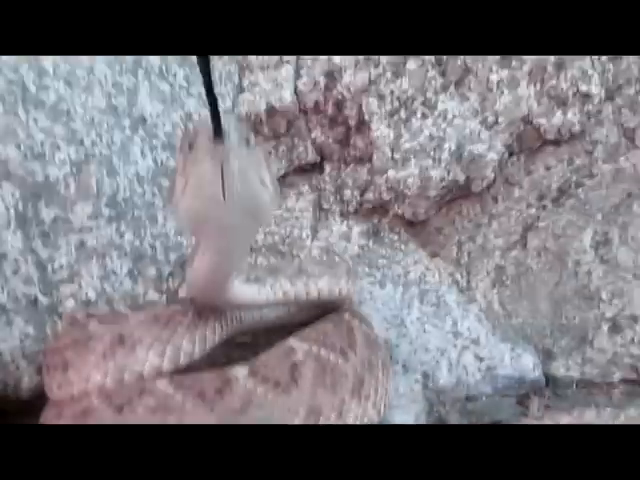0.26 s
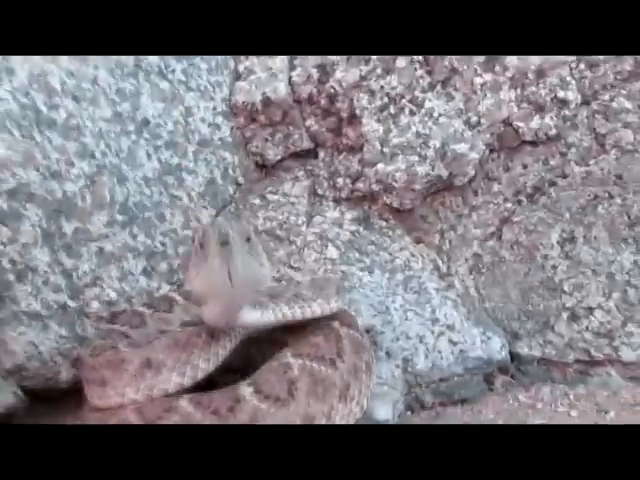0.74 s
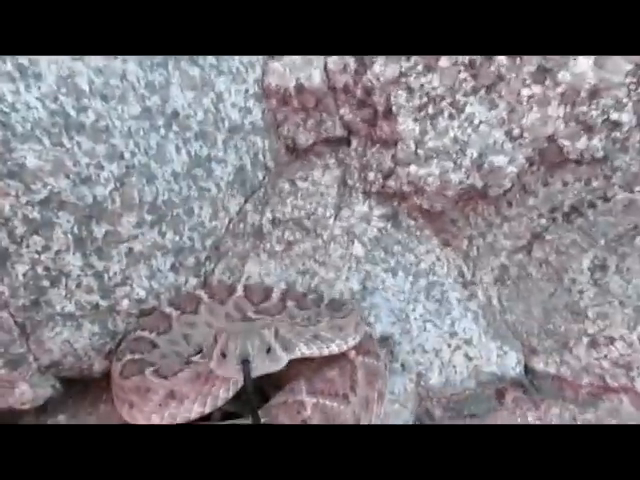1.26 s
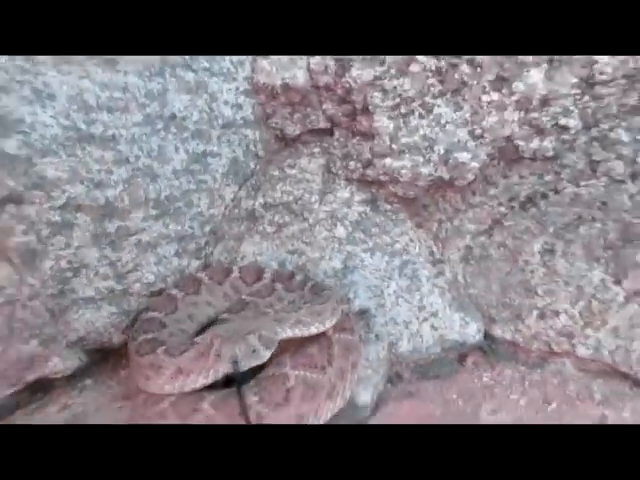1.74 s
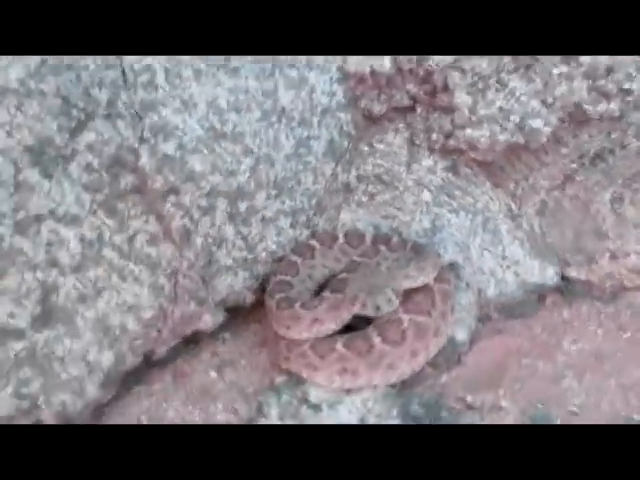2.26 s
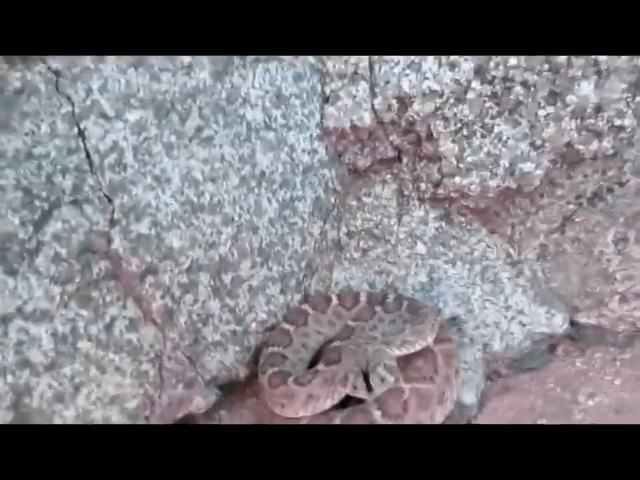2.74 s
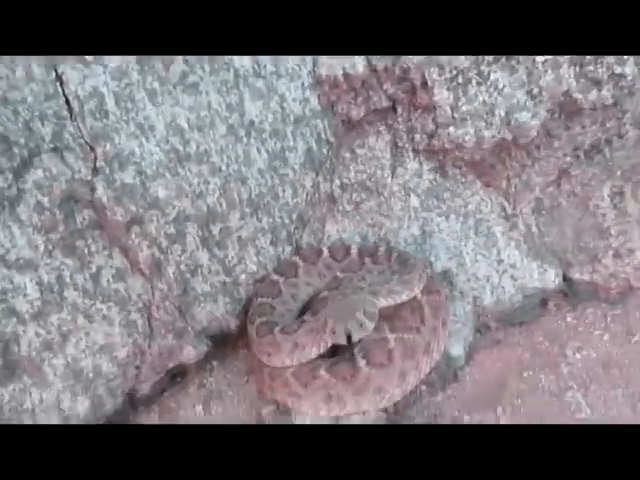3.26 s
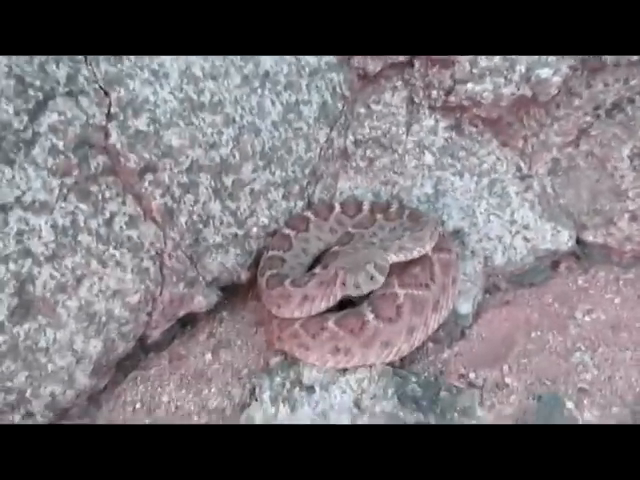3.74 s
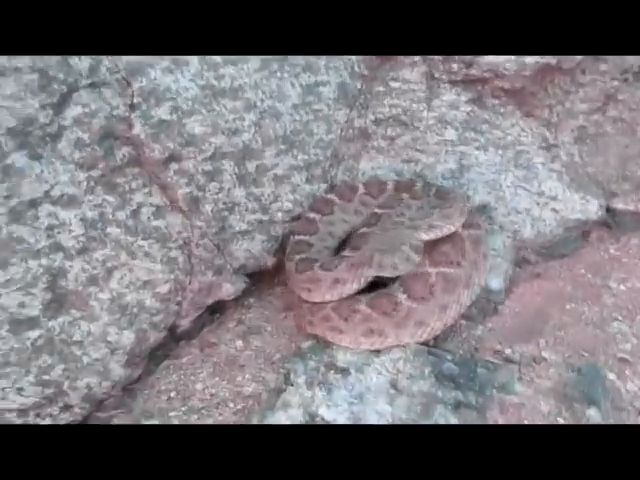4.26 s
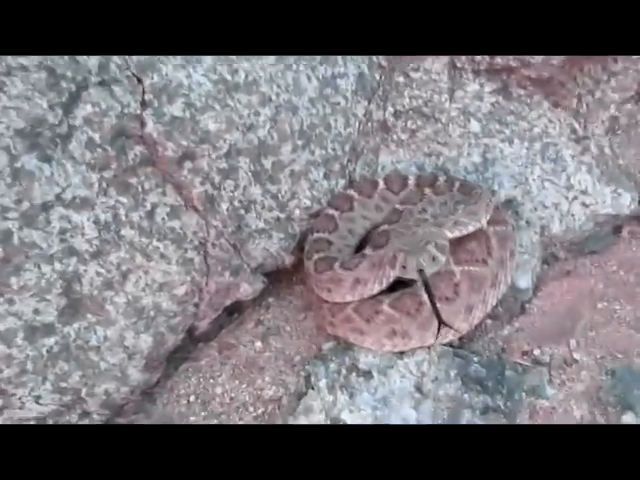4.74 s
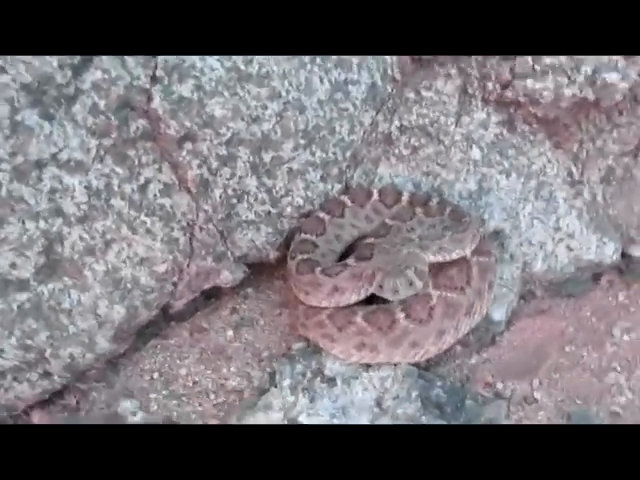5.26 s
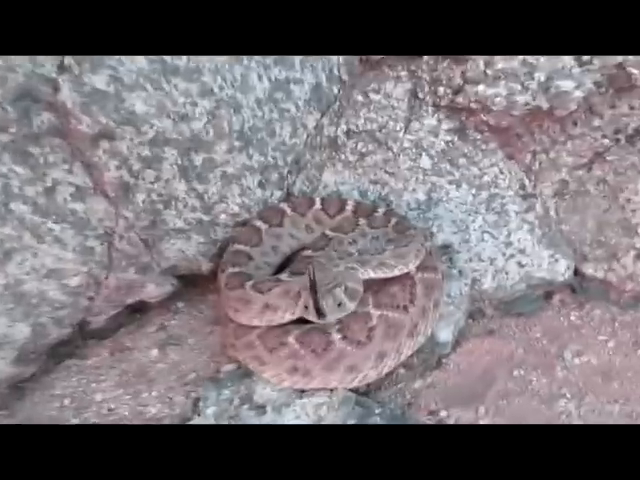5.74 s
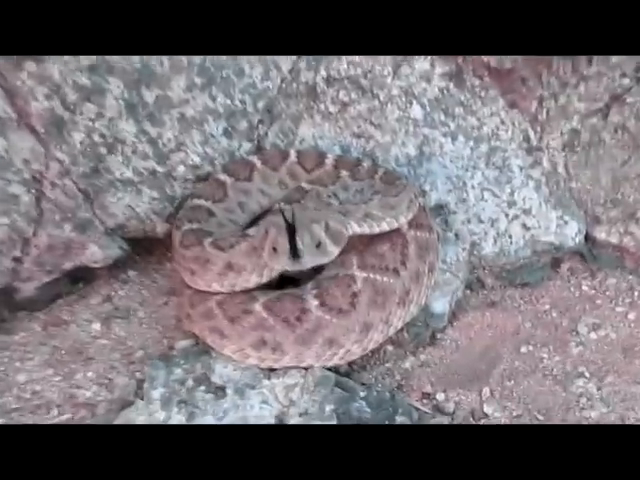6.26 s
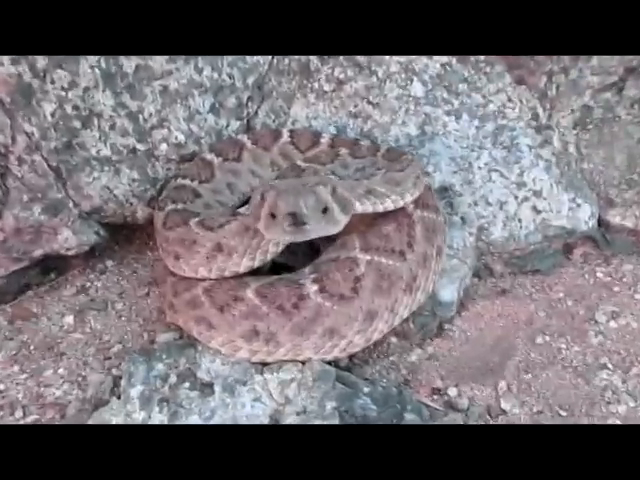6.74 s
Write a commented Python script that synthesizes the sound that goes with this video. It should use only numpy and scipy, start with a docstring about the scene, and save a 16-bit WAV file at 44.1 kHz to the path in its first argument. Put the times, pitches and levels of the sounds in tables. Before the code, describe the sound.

A bright, dry, hissing rattle dominates, close and nearly centred. It stutters at first, fuses into a harsh buzz, and settles into around twenty quick pulses per second with tiny irregular gaps. Beneath it are a few gritty shoe scuffs, faint rustles, quiet open air, and dull wind thumps on the left of the microphone, strongest in the middle and near the end.

```python
"""A rattlesnake against a rock wall opens with a few short tail bursts, over a shoe scuff and a soft rustle.
From 0.4 s it buzzes for a second, slackening once into bursts, then settles into about twenty bursts a second;
each tail stroke knocks hollow segments together, and their resonances shift as the snake lowers and coils.
Past 2 s shoes scuff gritty stone and noise gusts buffet mostly the left port, strongest near 3 s and 6 s.
A short buzz at 6.3 s leads into the last bursts; faint rustles come and go and quiet air noise lies below."""
import sys
import numpy as np
from scipy import signal
from scipy.io import wavfile
from scipy.ndimage import uniform_filter1d

SR = 44100
rng = np.random.default_rng(int(sys.argv[2]) if len(sys.argv) > 2 else 0)


def materialize(psi):
    """Save the field psi as 16-bit PCM at rate SR to the path in sys.argv[1].

    A 1-D psi becomes a single channel; in a 2-D psi each row is a channel.
    """
    bounded = np.clip(np.atleast_2d(psi).T, -1, 1)
    quanta = np.round(bounded * 32767).astype(np.int16)
    wavfile.write(sys.argv[1], SR, quanta)


N = 308700
TIME = np.arange(N) / SR


def from_db(db):
    """Decibels to an amplitude factor."""
    return 10 ** (np.asarray(db) / 20)


def rms_one(x):
    """Scales a signal to an RMS of 1."""
    return x / np.sqrt(np.mean(x ** 2) + 1e-20)


def in_time(rows, **ends):
    """A curve over time joined by straight lines."""
    return np.interp(TIME, *np.transpose(rows), **ends)


def at_hz(points, hz):
    """A spectrum joined by straight lines over log frequency."""
    points = np.array(points)
    return np.interp(np.log(hz), np.log(points[:, 0]), points[:, 1])


def drift(rate_hz):
    """Slow random wandering with spread 1: low-passed noise, computed at every 40th sample."""
    step, warm_up = 40, 2000
    pole = np.exp(-2 * np.pi * rate_hz * step / SR)
    white = rng.standard_normal(N // step + warm_up + 2)
    slow = signal.lfilter([1], [1, -2 * pole, pole * pole], white)[warm_up:]
    return np.interp(np.arange(N) / step, np.arange(len(slow)), rms_one(slow))


def evened(x, seconds):
    """Takes out level changes slower than the given time."""
    local_power = np.abs(uniform_filter1d(x ** 2, int(seconds * SR)))
    return x / np.sqrt(local_power + 1e-9)


def resonate(x, hz, width_hz):
    """A steep-sided resonance, two peak filters in a row, that keeps the power of white input."""
    peak = np.concatenate(signal.iirpeak(hz, hz / width_hz, fs=SR))
    sos = np.tile(peak, (2, 1))
    power = np.sum(signal.sosfilt(sos, signal.unit_impulse(1024)) ** 2)
    return signal.sosfilt(sos, x + 1e-18) / np.sqrt(power)


def noise_bands(spectrum, channels=2):
    """Yields half-octave noise bands as (Hz, signal), of total power 1."""
    low_hz, high_hz = spectrum[0][0], spectrum[-1][0]
    centres = np.geomspace(low_hz, high_hz, round(2 * np.log2(high_hz / low_hz)) + 1)
    # the spectrum is per Hz, so a wider band carries more power
    gains = from_db(at_hz(spectrum, centres)) * np.sqrt(centres)
    gains = gains / np.linalg.norm(gains)
    white = rng.standard_normal((2, channels, N))
    for k, (hz, gain) in enumerate(zip(centres, gains)):
        edges = [hz / 2 ** .25, hz * 2 ** .25]
        sos = signal.butter(2, edges, "band", fs=SR, output="sos")
        # neighbouring bands take different noise
        yield hz, gain * rms_one(signal.sosfilt(sos, white[k % 2]))


def noise(spectrum, channels=2):
    """Coloured noise of power 1."""
    return sum(band for hz, band in noise_bands(spectrum, channels))


def swells(rows, rise_db_per_s, fall_db_per_s):
    """Summed power of events that each rise, hold their level and fall."""
    power = np.zeros(N)
    for start_s, length_s, level_db in rows:
        rise_db = rise_db_per_s * np.clip(start_s - TIME, 0, 1)
        fall_db = fall_db_per_s * np.clip(TIME - start_s - length_s, 0, 1)
        power += from_db(level_db - rise_db - fall_db) ** 2
    return power


# unbroken buzzing, relative level, one table per spell: [time_s, level_db]
BUZZ_SPELLS = [
    [(0.382, -18.5), (0.44, -18), (0.53, -20.5), (0.66, -22.0), (0.78, -21.0), (0.875, -22), (0.9, -34),
     (0.95, -29), (0.98, -19), (1.17, -18.5), (1.38, -19.5), (1.43, -21.5)],
    [(6.295, -19.5), (6.368, -21)],
]
# hollow-segment resonances in each pose, with the part the rocks scatter sideways, relative to level_db:
# [pitch_hz, width_hz, level_db, side_db]
REARED_RINGS = [(2152, 2270, -26.0, -34), (3197, 580, -15.5, -5), (3966, 490, -21, 1),
                (5533, 1740, -9.5, -9), (6436, 905, -5.5, -20), (6866, 2300, -7.5, -5.5),
                (8947, 1100, -10, -3), (10840, 1820, -10.5, -3), (12620, 3870, -11.0, -3.5)]
LOWERED_RINGS = [(2322, 1720, -25, -26.5), (2801, 200, -27.5, -3.5), (3717, 750, -20.5, -4),
                 (5333, 465, -12, -8.5), (5936, 720, -4.5, -13.5), (7073, 1190, -7, -6.5),
                 (9186, 1340, -8.5, -1.5), (11187, 1650, -6.5, -4.5), (13200, 3170, -18.5, 0)]
COILED_RINGS = [(2546, 2670, -25.5, -19.5), (3252, 857, -21, -16), (4136, 530, -18, -9),
                (5631, 647, -14.5, -11.5), (6235, 958, -3.5, -16), (7700, 2040, -10, -2.5),
                (9252, 670, -12.5, -9), (11140, 3370, -5, -6), (14280, 600, -28.5, 1.5)]
SETTLED_RINGS = [(2426, 2780, -28.5, -57.5), (3311, 976, -22.5, -13.5), (4120, 498, -17.5, -10),
                 (5700, 440, -11, -13), (6217, 843, -2.5, -18.5), (7472, 2010, -9.5, -6.5),
                 (9344, 620, -11, -13.5), (11170, 3420, -6, -7), (11240, 6600, -13.5, -4.5)]
# the snake's posture, 0 reared, 1 lowered, 2 coiled, 3 settled: [time_s, pose_index]
POSTURE = [(0.7, 0), (1.02, 1), (1.42, 1), (1.62, 2), (4.1, 2), (5.2, 3)]


def rattle(loose_db=6.0, driven_db=-26, shifting_db=1.5, idle_db=-58, idle_spread_db=5, unsteady_db=-0.18):
    """The knocks ring the hollow segments, each resonance with a strength of its own."""
    bursts = beat()
    buzz = sum(from_db(in_time(spell, left=-np.inf, right=-np.inf)) ** 2 for spell in BUZZ_SPELLS)
    buzzing = uniform_filter1d((buzz > 0) * 1., size=400)
    buzz = uniform_filter1d(buzz, size=400) * from_db(unsteady_db * drift(25.7)) ** 2
    # the tail is never quite still between bursts
    idle = from_db(idle_db + idle_spread_db * drift(11.3)) ** 2
    effort = np.sqrt(np.maximum(shaking(bursts), buzz) + idle)
    # segments that are no longer driven hard tumble unevenly
    looseness = 1 / (1 + (effort / from_db(driven_db)) ** 2)
    tumble = from_db(loose_db * drift(105) * looseness)
    knocks = effort * tumble * rms_one(collisions(bursts, buzzing))

    pose, out = in_time(POSTURE), np.zeros((2, N))
    for k, rings in enumerate((REARED_RINGS, LOWERED_RINGS, COILED_RINGS, SETTLED_RINGS)):
        share = np.sqrt(np.clip(1 - np.abs(pose - k), 0, 1))   # crossfade at constant power
        held = share > 0
        for hz, width_hz, level_db, side_db in rings:
            # the swinging rattle radiates each resonance a little differently from moment to moment
            shifting = from_db(shifting_db * drift(60))
            drive = knocks * share * shifting * rng.standard_normal((2, N))
            gains = from_db([[level_db], [level_db + side_db]])
            mid, side = resonate(drive[:, held], hz, width_hz) * gains
            out[:, held] += np.array([mid + side, mid - side])
    return out


# runs of evenly spaced tail bursts, relative level: [first_burst_s, last_burst_s, burst_count, level_db]
BURST_RUNS = [(0.011, 0.126, 3, -19), (0.176, 0.349, 5, -18), (0.876, 0.966, 3, -18.5),
              (1.438, 1.614, 5, -19.5), (1.665, 2.5, 18, -20), (2.543, 2.747, 5, -19.5),
              (2.809, 2.963, 4, -19.5), (3.023, 3.383, 7, -19.5), (3.44, 3.819, 7, -19),
              (3.896, 4.086, 4, -19.0), (4.16, 4.422, 5, -19.2), (4.485, 4.678, 5, -19),
              (4.721, 4.88, 4, -19.0), (4.929, 4.929, 1, -28), (4.963, 5.43, 10, -18.5),
              (5.483, 6.068, 13, -19), (6.105, 6.324, 7, -18), (6.352, 6.696, 9, -17),
              (6.742, 6.956, 5, -18.5)]
# fade_s is the time to fall 60 dB at the usual beat; a faster beat keeps the segments moving longer
USUAL_BURSTS_PER_S, FADE_S, FADE_FOLLOWS = 20.74, 0.07616, 0.84


def beat(level_spread_db=1.176, fade_spread=0.1565):
    """Lays out all bursts as (time_s, level_db, fade_s), each varying in level and fading time."""
    bursts = []
    for first_s, last_s, count, level_db in BURST_RUNS:
        times = np.linspace(first_s, last_s, round(count))
        per_s = 1 / (times[1] - times[0]) if len(times) > 1 else USUAL_BURSTS_PER_S
        fade_s = FADE_S * (per_s / USUAL_BURSTS_PER_S) ** FADE_FOLLOWS
        for time_s, (force, length) in zip(times, rng.standard_normal((len(times), 2))):
            burst_db = level_db + level_spread_db * force
            bursts.append((time_s, burst_db, fade_s * np.exp(fade_spread * length)))
    return bursts


def shaking(bursts, hold_s=0.00257, rise_s=0.004895, coast_s=0.0251, coast_spread=0.49, stop_s=0.00763):
    """Power of bursts that swell, hold briefly, fade, and stop as the segments come to rest."""
    power = np.zeros(N)
    for time_s, level_db, fade_s in bursts:
        near = slice(max(int((time_s - .03) * SR), 0), int((time_s + .1) * SR))
        age = TIME[near] - time_s
        swell = np.exp(-(np.maximum(-age - hold_s, 0) / rise_s) ** 2.61)
        fade = 1e-6 ** (np.maximum(age - hold_s, 0) / fade_s)
        coast = coast_s * np.exp(coast_spread * rng.standard_normal())
        rest = np.exp(-(np.maximum(age - coast, 0) / stop_s) ** 2)
        power[near] += from_db(level_db) ** 2 * swell * fade * rest
    return power


# typical tail strokes per second, within a burst and in a full buzz
STROKES_PER_S, BUZZ_STROKES_PER_S = 130, 172


def collisions(bursts, buzzing, lead_s=0.01319, jitter=0.1512, uneven_db=3.67, rise_s=0.00235,
               settle_s=0.00252, chatter=0.128, buzz_chatter=0.152, knocks_per_s=22000):
    """Each stroke sets off a short cascade of knocks; loose chatter fills the gaps, most in a full buzz."""
    rate = STROKES_PER_S + (BUZZ_STROKES_PER_S - STROKES_PER_S) * buzzing
    rate = rate * np.exp(jitter * (1 - buzzing / 2) * drift(48.2))
    turn = np.cumsum(rate) / SR
    for time_s, level_db, fade_s in bursts:   # each burst begins with a fresh stroke
        start = max(int((time_s - lead_s) * SR), 0)
        turn[start:] += -turn[start] % 1
    stroke, age = turn.astype(int), turn % 1 / rate
    force = from_db(uneven_db * rng.standard_normal(N)[stroke])
    cascade = force * (1 - np.exp(-(age / rise_s) ** 2)) * np.exp(-age / settle_s)
    strength = cascade + chatter + buzz_chatter * buzzing
    knock_happens = rng.random(N) < knocks_per_s / SR
    return evened(strength * knock_happens, seconds=0.0098)


# gusts on the exposed left port: [start_s, length_s, level_db]
WIND_GUSTS = [(0.37, 0.146, -44), (0.86, 0.195, -37.5), (1.19, 0.0454, -35), (1.94, 0.1036, -38),
              (2.255, 0.218, -26), (2.5, 0.097, -30), (2.73, 0.1413, -26), (3.0, 0.0634, -22),
              (3.25, 0.103, -25.5), (3.54, 0.0757, -35), (3.89, .16, -37.5), (4.18, 0.033, -32),
              (4.32, 0.183, -36), (4.73, 0.199, -41.5), (5.22, 0.09, -42), (5.785, .035, -33),
              (5.975, 0.184, -24), (6.5, .07, -44), (6.74, 0.123, -38.5)]


def wind_on_ports(shelter_db=-19, breeze_db=-58, breeze_spread_db=3.5, eddies_db=-10.5):
    """The same gusts strike the left port fully and the right one weakly, over a wavering breeze."""
    gusts = swells(WIND_GUSTS, rise_db_per_s=602.5, fall_db_per_s=300)
    # weaker eddies before and behind each gust
    eddies = swells(WIND_GUSTS, rise_db_per_s=76, fall_db_per_s=76)
    gusts = gusts + from_db(eddies_db) ** 2 * eddies
    ports = []
    for exposure_db in (0, shelter_db):
        breeze = from_db(breeze_db + breeze_spread_db * drift(2.12)) ** 2
        ports.append(wind(gusts * from_db(exposure_db) ** 2 + breeze))
    return np.array(ports)


# buffeting spectrum at a wind level of -35 dB, relative level per Hz: [pitch_hz, level_db_per_hz]
BUFFET_COLOUR = [(20, -8.5), (40, -0.5), (85, 5.5), (180, 0), (350, -15), (600, -27.5), (1400, -50)]


def wind(power, brightening=0.367, lumpy_db=5.0, patchy_db=1.0):
    """Eddies hit a port in lumps; stronger gusts and eddies reach higher in pitch."""
    lumps = evened(from_db(lumpy_db * drift(26.4)), seconds=0.097)
    level_db, out = 10 * np.log10(power * lumps ** 2), 0
    for hz, band in noise_bands(BUFFET_COLOUR, channels=1):
        tilt_db = brightening * (level_db + 35) * np.clip(np.log2(hz / 120), -1, 1)
        out = out + band[0] * from_db(level_db + tilt_db + patchy_db * drift(11.1))
    return out


# shoes on stone, relative level, fade by 60 dB, thud against grind: [start_s, level_db, fade_s, weight_db]
SHOE_SCUFFS = [(0.055, -28.5, 0.14, -3), (2.347, -34, 0.006, 9.5), (2.409, -48, 0.35, 4),
               (2.584, -36, 0.08, 3), (2.632, -40, 0.17, 7.5), (5.213, -31, 0.0821, -9.5)]
# resonances of sole and stone, relative level: [pitch_hz, width_hz, level_db]
SOLE_RINGS = [(393, 166, -9), (704, 490, -4), (1142, 730, -8.5), (1609, 204, -6), (2580, 1840, -2.5)]
# dull thud spectrum, relative level per Hz: [pitch_hz, level_db_per_hz]
THUD_SPECTRUM = [(30, -13), (110, 1.5), (400, -18.5)]


def shoes(grit_db=5.5, press_s=0.0005, wide=0.81, echo_db=-19, echo_fade_s=0.146):
    """A sole knocks and grinds on the stone with a dull thud under it; the rocks answer faintly."""
    grind, thud = np.zeros(N), np.zeros(N)
    for start_s, level_db, fade_s, weight_db in SHOE_SCUFFS:
        age = np.clip(TIME - start_s, 0, 1)
        contact = from_db(level_db) * (1 - np.exp(-age / press_s))
        fade = 1e-3 ** (age / fade_s)
        echo = from_db(echo_db) * 1e-3 ** (age / echo_fade_s)
        grind += contact * (fade + echo)
        thud += contact * from_db(weight_db) * fade
    grind = grind * from_db(grit_db * drift(108))

    # a heavy step brings out the low resonances
    scuffs = np.array(SHOE_SCUFFS)
    latest = np.maximum(np.searchsorted(scuffs[:, 0], TIME) - 1, 0)
    weight_db = scuffs[latest, 3]
    rings = np.zeros((2, N))
    for hz, width_hz, level_db in SOLE_RINGS:
        ring_db = level_db + weight_db * (SOLE_RINGS[0][0] / hz) ** 2 / 2
        rings += from_db(ring_db) * resonate(grind * rng.standard_normal((2, N)), hz, width_hz)
    mid, side = rings + thud * noise(THUD_SPECTRUM)
    return np.array([mid + wide * side, mid - wide * side])


# soft rustles, level of the grains before their colour: [start_s, length_s, level_db]
SOFT_RUSTLES = [(0.01, 0.049, -42), (1.92, 0.206, -44.5), (2.22, 0.0945, -41), (2.4, 0.52, -58),
                (3.5, .08, -52), (4.2, 0.232, -53)]
# hollow colour of the rustling, relative level: [pitch_hz, width_hz, level_db]
RUSTLE_RINGS = [(1114, 1230, -10.5), (2073, 650, -1.5), (3154, 900, 2.5), (5240, 3100, 3.5)]


def rustle(grain_db=5.5, patchy_db=3.0, pan_db=-1.0):
    """A soft, grainy rustle with a wandering hollow colour, spread wide and a little to the right."""
    level = np.sqrt(swells(SOFT_RUSTLES, rise_db_per_s=236.5, fall_db_per_s=127))
    texture = evened(from_db(grain_db * drift(166)), seconds=0.0416)
    grains = level * texture * rng.standard_normal((2, N))
    out = np.zeros((2, N))
    for hz, width_hz, level_db in RUSTLE_RINGS:
        wandering = from_db(level_db + patchy_db * drift(15.8))
        out += wandering * resonate(grains, hz, width_hz)
    return out * from_db([[pan_db], [-pan_db]])


# spectrum of the open air, relative level per Hz: [pitch_hz, level_db_per_hz]
AIR_COLOUR = [(25, -19), (70, -13), (250, -3), (700, -9.5), (1300, -11.5), (4000, -10), (14000, -35.5)]


def open_air(level_db=-57.5):
    """Quiet, steady coloured noise, independent left and right."""
    return from_db(level_db) * noise(AIR_COLOUR)


def scene(rattle_db=-0.35, pan_db=-0.445, shoes_db=-4.0):
    """Snake (a touch to the right), wind, shoes, rustling and the quiet open air."""
    snake = rattle() * from_db([[rattle_db + pan_db], [rattle_db - pan_db]])
    steps = from_db(shoes_db) * shoes()
    return snake + wind_on_ports() + steps + rustle() + open_air()


def record(dry, cutoff_hz=15900):
    """Cuts the top steeply with an elliptic low-pass."""
    sos = signal.ellip(12, .1, 80, cutoff_hz, fs=SR, output="sos")
    return signal.sosfilt(sos, dry)


dry = scene()
out = record(dry)
materialize(out)
```